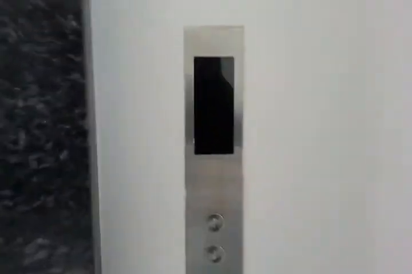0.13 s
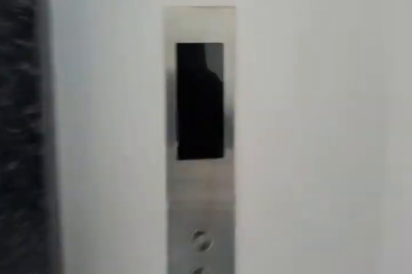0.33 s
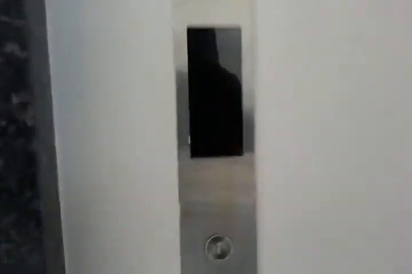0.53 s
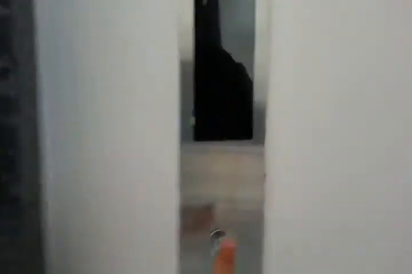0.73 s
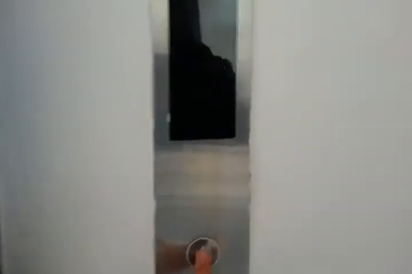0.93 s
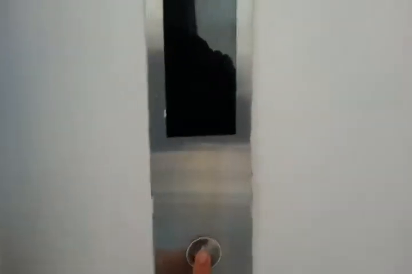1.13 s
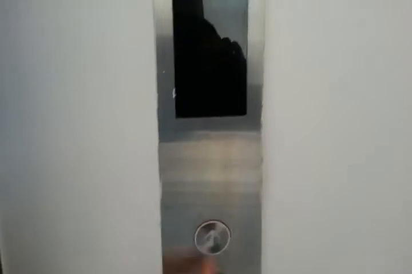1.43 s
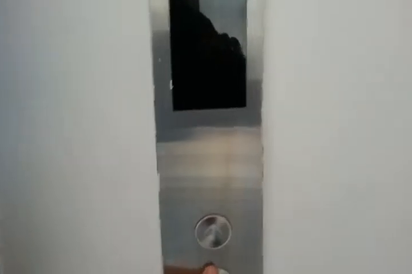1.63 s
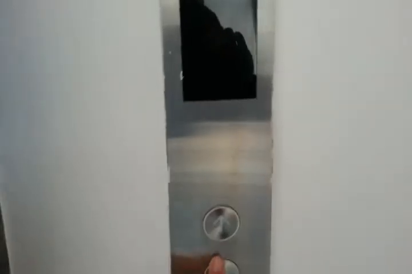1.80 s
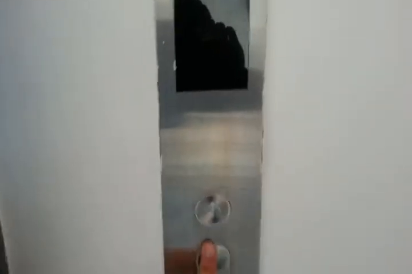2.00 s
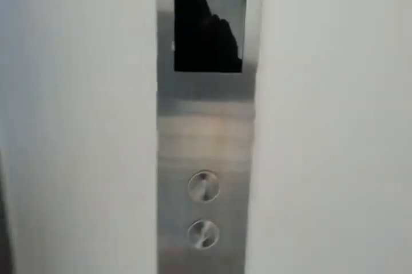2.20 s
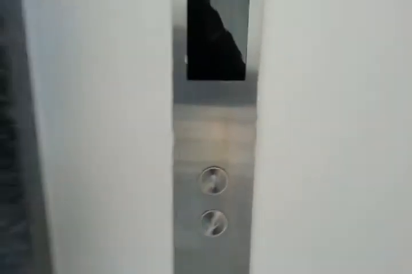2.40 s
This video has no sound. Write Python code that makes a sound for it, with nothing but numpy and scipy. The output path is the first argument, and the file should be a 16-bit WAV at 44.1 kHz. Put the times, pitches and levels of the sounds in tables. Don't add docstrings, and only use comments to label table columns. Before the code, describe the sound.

Lift button clicks on a steel panel: first sharp handling ticks and creaks from the camera grip, then a firm press, faint fumbling and a crisp release click, in a quiet indoor hall, close stereo hand-held microphone.

```python
import sys
import numpy as np
from scipy import signal
from scipy.fft import rfft, irfft
from scipy.io import wavfile
from scipy.ndimage import uniform_filter1d

SR = 44100
rng = np.random.default_rng(int(sys.argv[2]) if len(sys.argv) > 2 else 0)


def volts_from_decibels(level):
    exponent = np.asarray(level, float) / 20
    return 10 ** exponent


def to_wav(sig):
    pcm = np.clip(np.atleast_2d(sig), -1, 1) * 32767
    pcm = np.round(pcm).astype(np.int16)
    wavfile.write(sys.argv[1], SR, pcm.T)


N = 112454

# (frequency [Hz], density [dB per Hz])
CRACK_TONE = [(1000, -10.5), (1600, -6), (2200, -9), (3300, -10), (4800, -9.5), (7300, -5.5), (11500, -15),
              (15500, -30.5)]
RISE_S = .0005
FLICKER_DB = 1.0


def unit(x):
    return x / np.sqrt(np.mean(x ** 2))


def colour(x, shape):
    points = np.array(shape, float)
    hz = np.maximum(np.fft.rfftfreq(x.shape[-1], 1 / SR), 1)
    gain_db = np.interp(np.log(hz), np.log(points[:, 0]), points[:, 1])
    return irfft(rfft(x) * volts_from_decibels(gain_db), x.shape[-1])


def ring(x, modes):
    longest_s = max(mode[2] for mode in modes)
    t = np.arange(int(SR * longest_s) + 64) / SR
    response = 0
    for hz, db, t60 in modes:
        decay = volts_from_decibels(-60 * t / max(t60, .001))
        response = response + volts_from_decibels(db) * np.sin(2 * np.pi * hz * t) * decay
    return signal.oaconvolve(x, response / np.sqrt(np.sum(response ** 2)))[:N]


def walk(rate):
    k = int(SR / rate)
    w = uniform_filter1d(uniform_filter1d(rng.standard_normal(N), k), k)
    return w / w.std()


def pair(x, pan_db, lag_s=0.):
    late = np.interp(np.arange(N) - lag_s * SR, np.arange(N), x)
    return np.array([late * volts_from_decibels(pan_db / 2), x * volts_from_decibels(-pan_db / 2)])


def burst(s, length_s, rise_s):
    out, first = np.zeros(N), int(s * SR) + 1
    t = np.arange(first, min(N, first + SR // 2)) / SR - s
    rise = 1 - np.exp(-t / max(rise_s, 1e-5))
    out[first:first + len(t)] = rise * np.exp(-t / max(length_s, 1e-4))
    return out


def wide(shape, alike_hz):
    mid, side = rng.standard_normal((2, N))
    side = signal.lfilter(*signal.butter(N=1, Wn=alike_hz, btype="high", fs=SR), side)
    return unit(colour(np.array([mid + side, mid - side]), shape))


def knocks(table, body):
    # (frequency [Hz], level [dB], decay t60 [s])
    cavity = [(100, -18, 0.039), (127.4, -11, 0.095), (193, -7.5, 0.22), (217, -1.5, 0.046),
              (242.6, 8, 0.09), (297.8, 8.5, 0.069), (344, -9, 0.034), (483, 2, 0.033)]
    thump_trim_db, ring_trim_db, crack_trim_db = 0.5, -2.5, -11.5
    pad_s, pad_rise_s = 0.0029, 0.0011
    scrape_s, scrape_db, rub_db = 0.051, -23, -23
    blow_gain, grain_db, sway_db = 5, 2.5, -9
    force, blows = np.zeros((3, N)), np.zeros((2, N))
    for s, crack_db, thump_db, ring_db, length_s in table:
        contact = burst(s, length_s, RISE_S)
        drag = burst(s, scrape_s, 0.0015)
        soft = burst(s - pad_s, length_s, pad_rise_s)
        thump_gain = volts_from_decibels(thump_db + thump_trim_db)
        ring_gain = volts_from_decibels(ring_db + ring_trim_db)
        crack_gain = volts_from_decibels(crack_db + crack_trim_db)
        force[0] += thump_gain * soft
        force[1] += ring_gain * (contact + volts_from_decibels(rub_db) * drag)
        force[2] += crack_gain * (contact ** 0.99 + volts_from_decibels(scrape_db) * drag)
        blows[:, int((s + RISE_S) * SR)] += blow_gain * np.array([thump_gain, ring_gain])
    pad = np.hanning(int(2 * pad_s * SR))
    blows[0] = np.convolve(blows[0], 2 * pad / pad.sum(), "same")
    grit = unit(rng.standard_normal(N) * volts_from_decibels(grain_db * walk(600)))

    band = signal.butter(N=2, Wn=[110, 600], btype="band", fs=SR, output="sos")
    low = signal.sosfilt(band, ring(force[0] * rng.standard_normal(N) + blows[0], cavity))
    sway = signal.sosfilt(band, ring(force[0] * rng.standard_normal(N), cavity))
    thump = pair(low, .7, .0001) + volts_from_decibels(sway_db) * np.array([sway, -sway])
    ringing = pair(ring(force[1] * grit + blows[1], body), 1, -.00018)
    crack = force[2] * volts_from_decibels(grain_db * walk(364)) * wide(CRACK_TONE, 2800) * pair(np.ones(N), -2)
    return thump + ringing + crack


def buttons():
    # (time [s], crack [dB], thump [dB], ring [dB], length [s])
    upper = [(.915, -42, -55, -60, .008), (.9235, -19, -32, -33, 0.006), (.9325, -33, -36, -37, 0.0041),
             (.950, -58, -32.5, -39, 0.0042), (1.0215, -31, -44, -42, 0.014),
             (1.072, -51, -41, -42, 0.0068), (1.090, -47, -45, -53, 0.014), (1.129, -53, -46, -52, 0.0074),
             (1.137, -37.5, -50, -47, 0.018), (1.184, -46, -49, -52, 0.0095),
             (1.2356, -38.5, -39, -53, 0.0071), (1.255, -38, -47, -52, 0.015),
             (1.2695, -31.5, -42.5, -39.5, 0.013), (1.285, -34.5, -51, -36, 0.0077)]
    lower = [(1.448, -41, -46, -51, 0.021), (1.4629, -31.5, -41.5, -42, 0.012),
             (1.486, -51, -56.5, -75, 0.015), (1.5335, -43, -50.5, -58.5, 0.013),
             (1.5525, -43, -44, -42, 0.0084), (1.5665, -56, -41, -73.5, 0.0083),
             (1.613, -54, -47.5, -69, 0.014), (1.6619, -64, -36, -60, 0.01), (1.669, -64, -45, -48, 0.008),
             (1.692, -81, -56.5, -61.5, 0.0077), (1.729, -48.5, -60, -65.5, 0.016),
             (1.756, -86.5, -55.5, -88, 0.03), (1.824, -45.5, -52, -75, 0.014),
             (1.885, -60, -52, -70, .006), (1.8945, -52, -41, -54, 0.013), (1.928, -45.5, -52, -57, 0.018),
             (1.9937, -56, -40, -56, 0.012), (2.006, -60, -42, -56, .012), (2.0385, -40, -54.5, -49, 0.016),
             (2.079, -59, -56, -84.5, 0.0036), (2.1985, -60, -46, -62, 0.03),
             (2.2228, -29, -46, -40, 0.008), (2.234, -30, -45, -45, .004), (2.2375, -22, -36, -35, 0.0088),
             (2.2548, -74, -46, -70, 0.0059)]
    # (frequency [Hz], level [dB], decay t60 [s])
    panel = [(566, 2.5, 0.016), (856, 6.5, 0.042), (990, 9.5, 0.017), (1240, 9.5, 0.0066),
             (1376, 4.5, 0.015), (1577, -1, 0.034), (1800, -5, 0.019), (2290, -3, 0.0072)]
    return knocks(upper + lower, panel)


def room(x):
    t60_s, top_hz, level_db = 0.19, 6200, -17
    t = np.arange(SR // 2) / SR
    tail = rng.standard_normal((2, len(t))) * volts_from_decibels(-60 * t / t60_s) * (t > .004)
    tail = signal.lfilter(*signal.butter(N=1, Wn=top_hz, fs=SR), tail)
    tail = tail / np.sqrt(np.sum(tail ** 2) / 2)
    return volts_from_decibels(level_db) * signal.fftconvolve(x, tail, axes=1)[:, :N]


def snaps():
    # (time [s], peak [dB], length [s], pitch [Hz])
    snap_events = [(.0700, -45, .002, 1300), (.9240, -22, .002, 3600), (.9320, -24, .003, 1570),
                   (.9320, -28, .002, 2900), (1.0213, -33, .008, 1570), (1.139, -47, .005, 1500),
                   (1.186, -48, .004, 1450), (1.5522, -41, .003, 2400), (1.5530, -38, .003, 4100),
                   (1.4645, -40, .006, 3700), (1.466, -42, .01, 1000), (1.2705, -40, .004, 1600),
                   (1.729, -56, .006, 11200), (1.8255, -52, .005, 11200), (1.929, -52, .006, 11200),
                   (2.039, -51, .006, 11200), (1.670, -50, .008, 830), (2.240, -36, .012, 840),
                   (1.930, -50, .004, 1400), (2.0405, -44, .005, 1400), (2.2232, -29, .003, 3900),
                   (2.2240, -26, .003, 6500), (2.2340, -23, .002, 7300), (2.2375, -26, .004, 1450),
                   (2.2378, -20, .006, 7200)]
    ring_cycles, edge_db = 34, -8
    out, noise = np.zeros((2, N)), wide(CRACK_TONE, 2500)
    for s, db, length_s, hz in snap_events:
        push = burst(s, length_s, RISE_S) * noise
        rung = np.array([ring(side, [(hz, 0, ring_cycles / hz)]) for side in push])
        hit = unit(rung) + volts_from_decibels(edge_db) * unit(push)
        out += volts_from_decibels(db) * hit / np.abs(hit).max()
    return out


def slide():
    # (start [s], hold [s], release [s], level [dB])
    slide_events = [
        (0.922, 0.11, 0.38, -41.5),
        (1.236, 0.084, 0.0066, -60.5),
        (1.458, 0.023, .02, -61),
        (1.535, 0.034, 0.028, -52),
    ]
    # (frequency [Hz], density [dB per Hz])
    slide_tone = [(300, 10.5), (900, -4), (1600, -1), (3000, -7.5), (7300, -9), (13000, -17.5),
                  (15000, -38)]
    rise_s, sag_db_per_s = 0.0074, 35.5
    t, envelope = np.arange(N) / SR, 0
    for s, hold_s, release_s, db in slide_events:
        since = np.maximum(t - s, 0)
        rise = np.minimum(since / rise_s, 1)
        release = np.exp(-np.maximum(since - hold_s, 0) / release_s)
        envelope = envelope + volts_from_decibels(db - sag_db_per_s * since) * rise * release
    return wide(slide_tone, 690) * envelope * volts_from_decibels(FLICKER_DB * walk(130))


def wall():
    # (time [s], peak [dB])
    shakes = [
        (.285, -48),
        (0.924, -36),
        (1.031, -45.5),
        (1.276, -50),
        (1.466, -48),
        (1.553, -47.5),
        (1.665, -56),
        (2.239, -56),
    ]
    # (frequency [Hz], level [dB], decay t60 [s])
    wall_modes = [(75.7, 4, 0.3), (123, -7.5, .1), (167, 7.5, .1)]
    t, width_s = np.arange(N) / SR, .0012
    push = sum(volts_from_decibels(db) * np.exp(-.5 * ((t - s) / width_s) ** 2) for s, db in shakes)
    shaken = ring(push, wall_modes)
    return pair(shaken * push.max() / np.abs(shaken).max(), -2.5)


def creaks():
    # (time [s], crack [dB], thump [dB], ring [dB], length [s])
    creak_events = [(.062, -42, -78, -100, 0.0052), (.070, -36, -81.5, -73.5, 0.0028),
                    (.131, -39, -47.5, -41.5, 0.018), (.143, -40, -53, -51, 0.032),
                    (.180, -37.5, -41, -37, 0.012), (.196, -36, -40, -37.5, 0.0034),
                    (.2145, -32, -37.5, -42, 0.015), (.2535, -33.5, -40.5, -37, 0.0057),
                    (.277, -23.5, -36.5, -42, 0.0078), (.2865, -34, -38.5, -35, 0.0041)]
    # (frequency [Hz], level [dB], decay t60 [s])
    grip = [(513, -5.5, 0.029), (615, -20.5, 0.013), (656, 3.5, 0.025), (827, -4.5, 0.033),
            (1125, -2, 0.0091), (1700, -1, .015)]
    return knocks(creak_events, grip)


def ticks():
    # (time [s], peak at nearer port [dB], pan left-right [dB], length [s], pitch [Hz])
    tick_events = [(.1497, -28, -12, .0004, 8500), (.1522, -36, -12, .0004, 7500),
                   (.15565, -13, -26, .00007, 8600), (.21436, -1.5, -30, .00003, 7600),
                   (.21438, -10, -30, .00002, 11500), (.2149, -13, 30, .00007, 4900),
                   (.2537, -9, 30, .0003, 5200), (.2541, -9, 30, .0001, 5600),
                   (.2542, -17, 12, .0003, 2050), (.2540, -19, 12, .0002, 2900),
                   (.2540, -4.5, -30, .00035, 7400), (.2551, -14, -30, .0002, 7400),
                   (.2768, -12, -30, .0003, 7400), (.2773, -24, 30, .0003, 5500),
                   (.2844, -23, -8, .0002, 8000), (.2846, -28, -8, .0002, 11500),
                   (.2874, -24, 3, .0002, 6000)]
    # (frequency [Hz], level [dB], decay t60 [s])
    case = [(2000, -1, .004), (3000, -8, .003), (3900, -10, .003), (5400, -8, .003), (10500, -3, .0015),
            (13000, -1, .0015)]
    inlet_t60_s, body_db, edge_db, shade_hz = .0014, -12, -4, 8000
    t = np.arange(N) / SR
    out, noise = np.zeros((2, N)), np.gradient(rng.standard_normal(N))
    for s, db, pan_db, length_s, hz in tick_events:
        push = np.exp(-.5 * ((t - s) / length_s) ** 2)
        snap = signal.lfilter(*signal.butter(N=2, Wn=hz / 3, btype="high", fs=SR), push * noise)
        edge = volts_from_decibels(body_db - edge_db) * ring(snap, case) + snap
        inlet = ring(push * np.cos(2 * np.pi * hz * (t - s)), [(hz, 0, inlet_t60_s)])
        tick = inlet / np.abs(inlet).max() + volts_from_decibels(edge_db) * edge / np.abs(edge).max()
        out += volts_from_decibels(db - abs(pan_db) / 2) * pair(tick / np.abs(tick).max(), pan_db)
    shaded = signal.lfilter(*signal.butter(N=1, Wn=shade_hz, fs=SR), out[0])
    return np.array([shaded, out[1]])


def rustle():
    # (time [s], level [dB])
    movement = np.array([(0, -54), (.055, -67), (0.068, -56), (.12, -58.5), (.13, -53), (.29, -48),
                         (.33, -69), (.6, -75.5), (.67, -61.5), (0.688, -54), (.76, -61), (.85, -69),
                         (.918, -76), (1.4, -101), (2.214, -66.5), (2.25, -46.5), (2.55, -52)])
    # (frequency [Hz], density [dB per Hz])
    cloth_tone = [(59, -35.5), (100, -10.5), (169, -4), (383, -15.5), (452, -13), (2800, -20), (7050, -7.5),
                  (13800, -30), (15000, -26)]
    t = np.arange(N) / SR
    level_db = np.interp(t, movement[:, 0], movement[:, 1]) + FLICKER_DB * walk(20)
    return wide(cloth_tone, 500) * pair(volts_from_decibels(level_db), 0.5)


def hall():
    # (frequency [Hz], density [dB per Hz])
    hum_tone = [(25, -17), (50, 0.5), (78, -1.5), (150, 0.5), (300, -4), (800, -15), (7300, -23),
                (15000, -22)]
    level_db = -63.5 - 2.5 + 0.35 * walk(5.7)
    return wide(hum_tone, 695) * volts_from_decibels(level_db)


def scene():
    pressed = buttons()
    button_sound = pressed + room(pressed) + snaps() + slide() + wall()
    return button_sound + creaks() + ticks() + rustle() + hall()


def roll_off(x):
    return signal.sosfilt(signal.butter(12, 16600, fs=SR, output="sos"), x)


def record(dry):
    trimmed = signal.sosfilt(signal.ellip(5, .3, 20, 14600, fs=SR, output="sos"), dry)
    mix = signal.sosfilt(signal.butter(N=3, Wn=48, btype="high", fs=SR, output="sos"), trimmed)
    return roll_off(mix)


dry = scene()
out = record(dry)
to_wav(out)
```